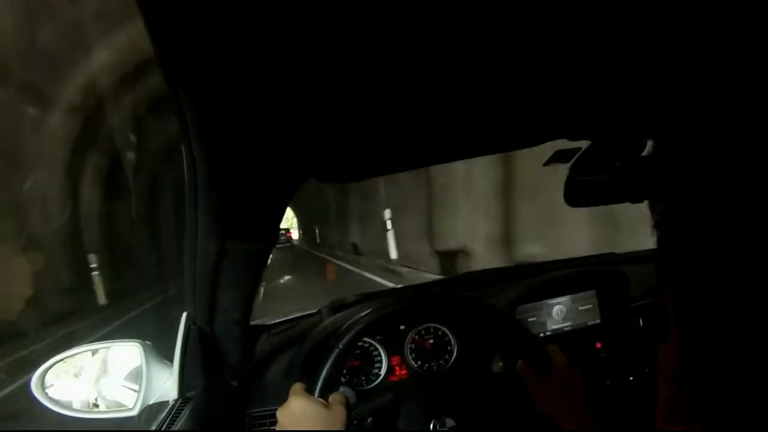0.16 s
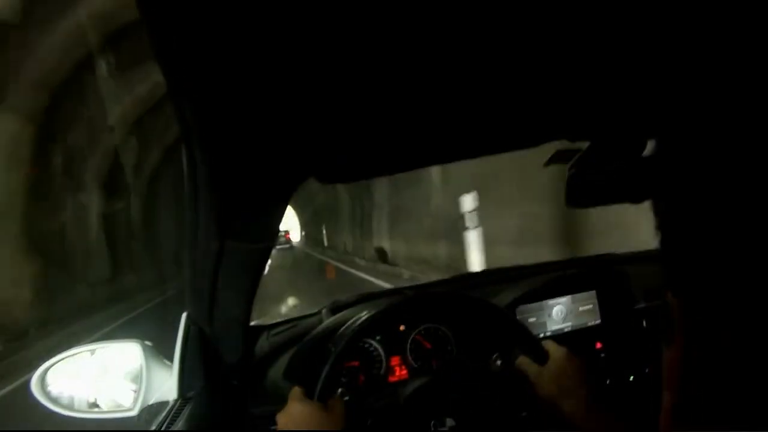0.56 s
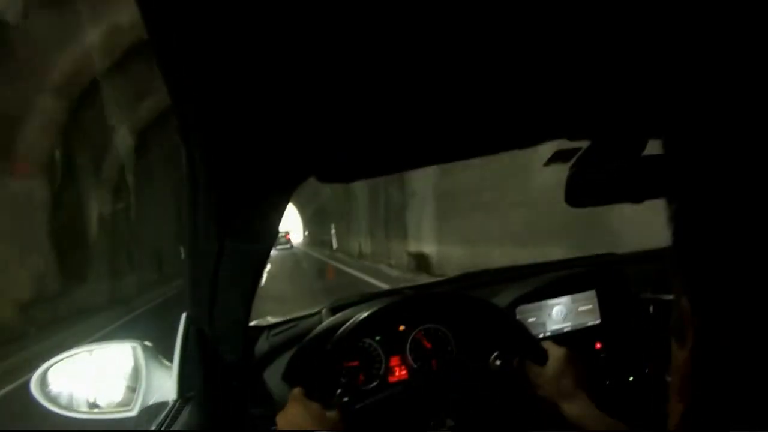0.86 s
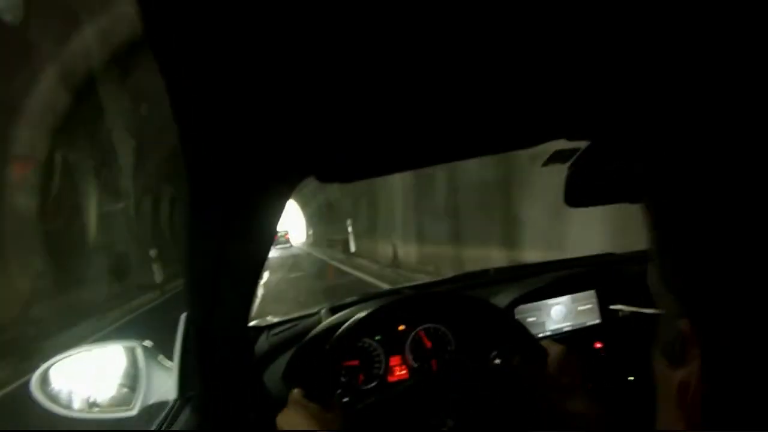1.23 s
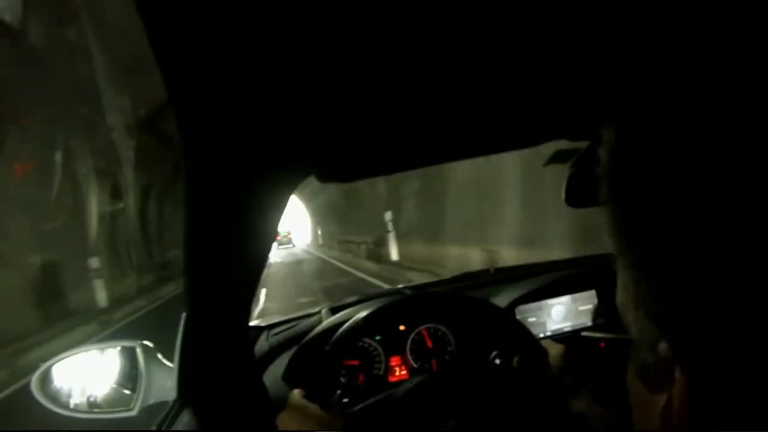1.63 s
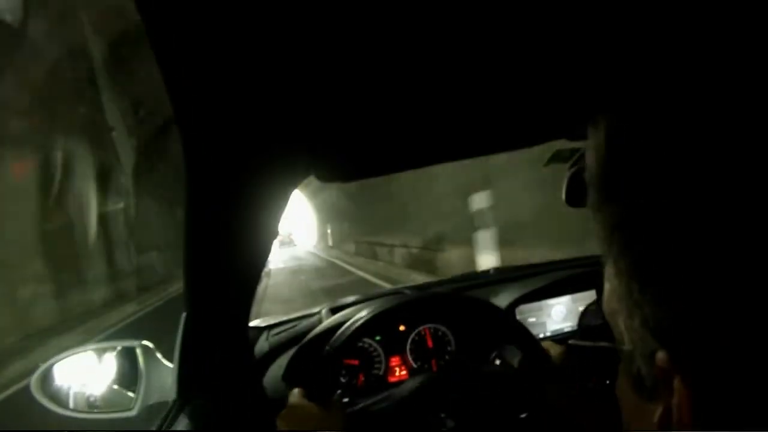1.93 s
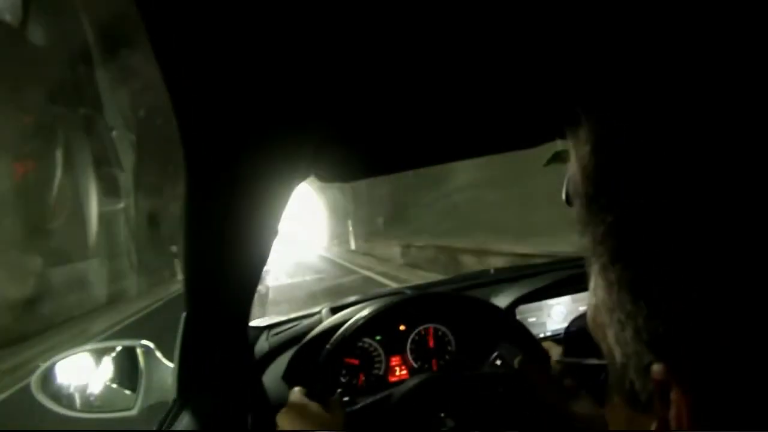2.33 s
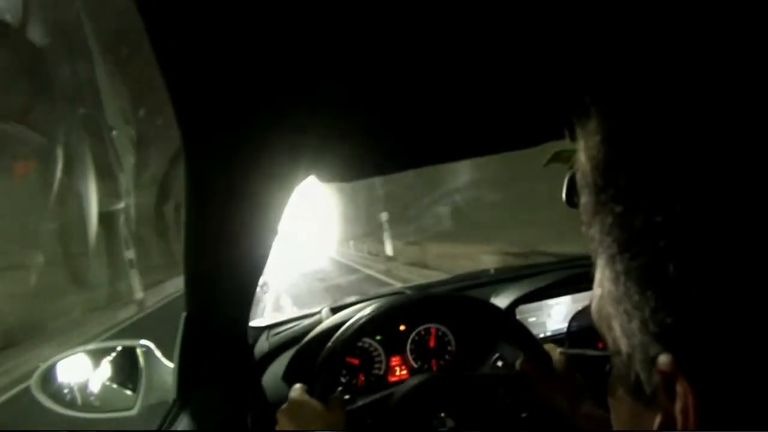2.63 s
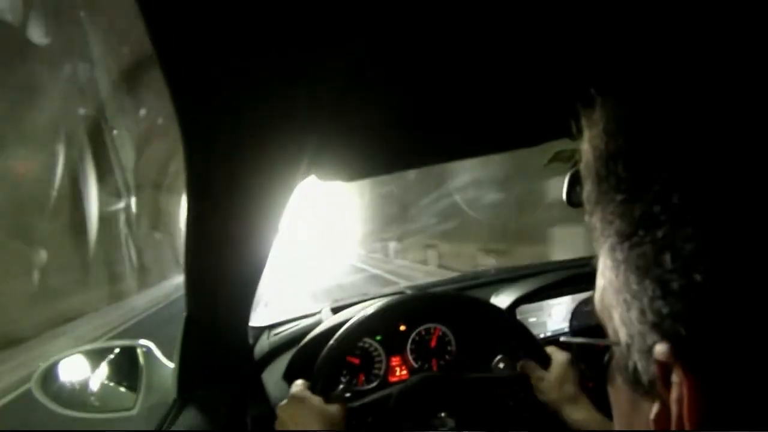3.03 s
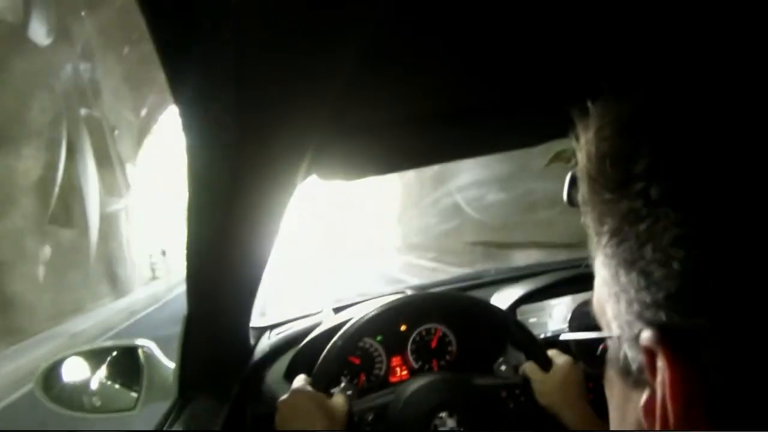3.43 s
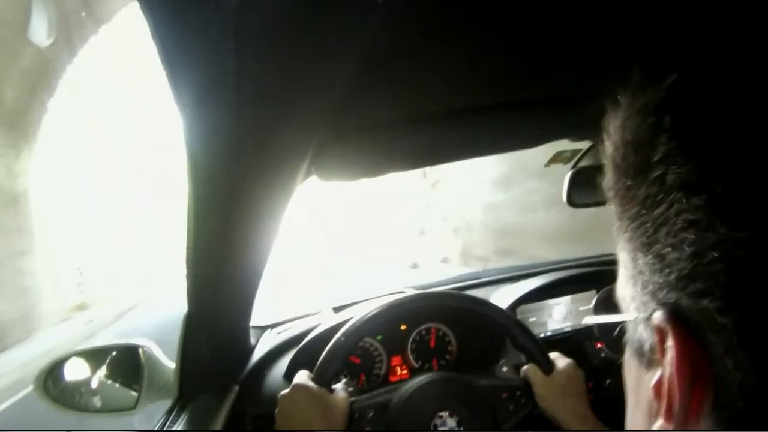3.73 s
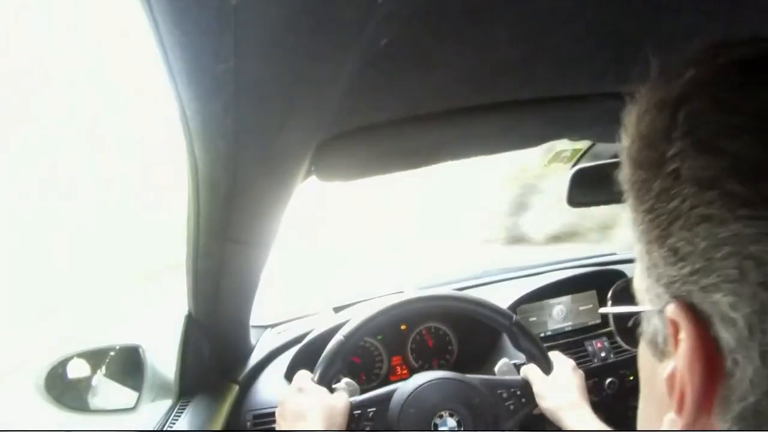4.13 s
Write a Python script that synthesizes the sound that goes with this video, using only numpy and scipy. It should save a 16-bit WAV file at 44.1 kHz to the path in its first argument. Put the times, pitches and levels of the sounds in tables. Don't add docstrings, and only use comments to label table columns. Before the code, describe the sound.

Inside a speeding car with an open window, a loud multi-cylinder exhaust climbs through tunnel reverberation, then sinks as the car comes out.

```python
import sys
import numpy as np
from scipy import signal
from scipy.fft import rfft, irfft, next_fast_len
from scipy.io import wavfile
from scipy.ndimage import uniform_filter1d, map_coordinates

SR = 44100
rng = np.random.default_rng(int(sys.argv[2]) if len(sys.argv) > 2 else 0)


def int16_out(signal):
    q = np.round(np.clip(np.atleast_2d(signal).T, -1, 1) * 32767)
    wavfile.write(sys.argv[1], SR, q.astype(np.int16))


def to_linear_factor(level_db):
    exponent = np.asarray(level_db, float) / 20
    return 10 ** exponent


N = 188262
TIME = np.arange(N) / SR


def unit(x):
    return x / np.sqrt(np.mean(x ** 2) + 1e-20)


def along(points, hz):
    f, value = np.transpose(points)
    return np.interp(np.log(hz + 1), np.log(f + 1), value)


def curve(rows):
    s, value = np.transpose(rows)
    return np.interp(TIME, s, value)


def bumps(rows):
    return sum(height * np.exp(-((TIME - s) / length) ** 2) for s, height, length in rows)


def wobble(rate):
    coarse = np.arange(0, N / SR + .01, .004)
    knots = rng.standard_normal(int(N * 40 / SR) + 4)
    return np.interp(TIME, coarse, map_coordinates(knots, [coarse * min(rate, 40)]))


def rush(spectrum, patchy_db):
    _, _, z = signal.stft(rng.standard_normal(N + 2048), SR, nperseg=1024)
    patches = uniform_filter1d(rng.standard_normal(z.shape), size=8, axis=0)
    patches = uniform_filter1d(patches, size=5, axis=1)
    noise = signal.istft(z * to_linear_factor(patchy_db * unit(patches)), SR, nperseg=1024)[1]
    m = next_fast_len(len(noise))
    colour = to_linear_factor(along(spectrum, np.fft.rfftfreq(m, 1 / SR)))
    return unit(irfft(rfft(noise, m) * colour, m)[:N])


# (t/s, f/Hz)
BANK_RATE = [
    (0, 120.5),
    (.5, 136.3),
    (.75, 145.8),
    (2, 197.5),
    (2.75, 229.9),
    (2.9, 233.7),
    (3.05, 234),
    (3.28, 233.6),
    (3.4, 218),
    (4.27, 137.1),
]


def crankshaft():
    bank_hz = curve(BANK_RATE)
    return bank_hz, 2 * np.pi * np.cumsum(bank_hz) / SR + .05 * wobble(14)


# (t/s, level/dB)
LIFT_OFF = [
    (0, 0),
    (2.95, 0),
    (3.22, -6),
    (4.27, -7),
]


def throttle():
    return curve(LIFT_OFF)


# (f/Hz, width/Hz, level/dB)
PIPE_MODES = [(190, 73, 1), (220, 37, -8.5), (323.4, 59, 9.5), (570, 93, 2.5), (800, 41, -8.5),
              (1024, 57, 2), (1340, 48, -18.5), (1860, 96, -11), (2650, 140, -18.5)]


def pipe_gain(hz):
    grid = np.arange(0, 4000, 4)
    power = sum(to_linear_factor(2 * db) / (1 + (2 * (grid - f) / width) ** 2) for f, width, db in PIPE_MODES)
    return np.interp(hz, grid, np.sqrt(power))


# (f/Hz, width/Hz, level/dB)
CABIN_MODES = [(126.8, 16, -0.5), (157, 55, -7.5), (196.9, 24, -5.5), (228.8, 25.3, -3.5),
               (260.7, 31, -8.5), (315.7, 38, -4.5), (364.7, 40, -11.5)]
# (f/Hz, width/Hz, level/dB)
TAILPIPE_MODES = [(414, 25, -18.5), (495.2, 53, -7), (538.6, 59, -5.5), (591.5, 58, -10.5), (664, 98, -13),
                  (776, 35, -9.5), (1025, 107, -4.5), (1220, 280, -13.5), (1444, 79, -6.5),
                  (1856, 350, -11)]


def boom_gain(hz):
    grid = np.arange(0, 4000, 2)
    power = sum(to_linear_factor(2 * db) / (1 + (2 * (grid - f) / width) ** 4) ** 1.26
                for f, width, db in [*CABIN_MODES, *TAILPIPE_MODES])
    return np.interp(hz, grid, np.sqrt(power))


UNEVENNESS = [-5, -4.5, -4, -2.5, 1.5]
# (fifths of the bank rate, level/dB, tilt/dB per octave of revs)
LEADING_TONES = [(5, 0, -3), (7, -10.5, -0.5), (8, -5.5, 1), (9, -9.5, 5.5), (10, 1, -7),
                 (11, -10.5, -18.5), (13, -9.5, -3.5), (15, 0.5, 2.5), (18, -11.5, -12), (19, -7.5, -11.5),
                 (20, -6, -17), (25, -6.5, -5.5), (30, -7.5, -2), (35, -13, 10), (40, -16.5, -1.5),
                 (45, -13, 2.5), (50, -15, 0.5), (55, -17.5, 0.5)]
# (fifths of the bank rate, t/s, level/dB, length/s)
TONE_SWELLS = [(7, 1.16, -15, .16), (7, 1.6, -17, .22), (7, 2.28, -11, .09), (4, 2.8, -16, .22),
               (16, .75, -21, .17), (9, 2.1, -21, .2), (10, 2.28, -21, .13), (10, 2.88, -19, .12),
               (15, 0, -21, .07)]


def exhaust_tones(bank_hz, turn, throttle_db):
    opens_s, opening_s, shut_db = .55, 0.033, -9
    muffled_db = shut_db * (1 - np.tanh((TIME - opens_s) / opening_s)) / 2
    octaves = np.log2(bank_hz / 162.8)
    leads = {round(n): rest for n, *rest in LEADING_TONES}
    out = 0
    for fifth in range(1, 61):
        k = fifth / 5
        if fifth in leads:
            db, tilt_db = leads[fifth]
            level_db = -9.5 + db + tilt_db * octaves + 0.84 * k * throttle_db + (k > 3) * muffled_db
            size = to_linear_factor(level_db) * boom_gain(k * bank_hz)
        else:
            uneven_db = UNEVENNESS[(fifth - 1) % 5] * (1.5 if k > 3 else 1)
            size = to_linear_factor(uneven_db - 29.5) * to_linear_factor(2 * throttle_db) * pipe_gain(k * bank_hz)
        swells = [(s, to_linear_factor(db), length) for n, s, db, length in TONE_SWELLS if round(n) == fifth]
        size = size + bumps(swells)
        if fifth in (5, 7, 10, 15):
            flicker_db = 1.2
        elif fifth % 5 == 0:
            flicker_db = 2
        else:
            flicker_db = min(.7 * k, 3.5)
        flicker = to_linear_factor(flicker_db * wobble(18))
        out = out + size * flicker * np.sin(k * turn + rng.uniform(0, 2 * np.pi))
    return out


# (t/s, level/dB)
EFFORT = [(0, -34.5), (.4, -37), (.75, -34.5), (.83, -36.5), (1, -30), (1.12, -32.5), (1.25, -31),
          (1.6, -34), (2.1, -28.5), (2.85, -28.5), (3.15, -28.5), (3.5, -35), (3.95, -27.5), (4.2, -39.5),
          (4.27, -36)]
# (f/Hz, level/dB per Hz)
RASP_COLOUR = [(300, -68), (800, -1.5), (1100, -3.5), (1450, -2), (1600, -10.5), (2000, -7.5),
               (2600, -14.5), (3300, -20), (5000, -45), (12000, -120)]


def exhaust_rasp(turn, throttle_db):
    gate = 1 + 0.098 * np.cos(turn)
    level_db = curve(EFFORT) + 6.5 + 0.13 * throttle_db
    return to_linear_factor(level_db) * unit(gate * rush(RASP_COLOUR, patchy_db=0.84))


# (f/Hz, decay by 60 dB/s)
TUNNEL_DECAY = [(100, 0.64), (500, 2.12), (1500, 4.3), (4000, 0.76)]


def tunnel_tail(x):
    frames = dict(fs=SR, nperseg=4096, noverlap=3072)
    hz, t, z = signal.stft(x, **frames)
    keep = to_linear_factor(-120 * (t[1] - t[0]) / along(TUNNEL_DECAY, hz))
    stored = np.abs(z) ** 2
    stored[:, 0] = stored[:, 2]
    for i in range(1, len(t)):
        stored[:, i] = keep * stored[:, i - 1] + (1 - keep) * stored[:, i]
    lowered = np.array([np.interp(hz * 1.035, hz, column) for column in stored.T]).T
    noise = signal.stft(rng.standard_normal(N), **frames)[2]
    noise = noise / np.sqrt(np.mean(np.abs(noise) ** 2))
    return signal.istft(noise * np.sqrt(lowered), **frames)[1][:N]


def tunnel_answer(tones, throttle_db):
    exit_s, exit_length_s, outside_db = 3.87, 0.3, -8
    outside = (1 + np.tanh((TIME - exit_s) / exit_length_s)) / 2
    level_db = -8.5 + 2 * TIME - 0.49 * throttle_db + outside_db * outside
    return to_linear_factor(level_db) * tunnel_tail(tones)


# (t/s, buffet level/dB, road level/dB, length/s)
GUST_HITS = [(0, 5, -3, 0.048), (.72, 6, 7, 0.075), (0.809, -3, -22, 0.036), (.88, 7, 1, .03),
             (1.055, 7.5, 1, 0.086), (1.7, 5, -0.5, .05), (2.24, -7, -1.5, 0.09), (2.594, 1, 3.5, 0.059),
             (3.11, 9.5, 2, 0.032), (3.459, 3, 2, 0.075), (3.7, 2.5, 1, 0.29), (4.11, 7.5, 4.5, 0.085)]
# (f/Hz, level/dB per Hz)
BUFFET_COLOUR = [(8, -34), (15, -1), (32, -5.5), (60, -4), (100, -9.5), (160, -27), (400, -57.5),
                 (2000, -120)]


def window_buffet():
    gusts_db = bumps([(s, db, length) for s, db, _, length in GUST_HITS])
    level_db = -21.5 + 1.5 * wobble(6.6) + gusts_db
    return to_linear_factor(level_db) * rush(BUFFET_COLOUR, patchy_db=0.0)


# (f/Hz, level/dB per Hz)
TYRE_COLOUR = [(40, -62.5), (100, -4), (160, -8.5), (210, -0.5), (280, -12.5), (600, -17.5), (900, -14.5),
               (1500, -25.5), (3000, -45.5), (8000, -120)]


def tyre_roar():
    gusts_db = bumps([(s, db, length) for s, _, db, length in GUST_HITS])
    level_db = -24 + 2 * TIME + gusts_db + 1.5 * wobble(18)
    return to_linear_factor(level_db) * rush(TYRE_COLOUR, patchy_db=2.0)


# (t/s, level/dB)
WIND = [(0.0, -48.5), (0.29, -49), (0.37, -51.5), (0.73, -46), (0.85, -50), (0.92, -46), (1.11, -48.5),
        (1.59, -48), (1.6, -46), (1.79, -48), (2.79, -43), (3.18, -47), (3.98, -49), (4.25, -53.5)]
# (f/Hz, level/dB per Hz)
HISS_COLOUR = [(1000, -54), (2500, -9.5), (3300, -2.5), (4000, 1), (5000, -3), (6300, -5.5), (7200, -11.5),
               (8500, -16), (10000, -21), (11500, -29), (13000, -33.5), (15000, -38.5), (16000, -68.5),
               (22000, -120)]
# (f/Hz, level/dB per Hz)
AIRY_COLOUR = [(5000, -47.5), (8000, -7), (10000, -0.5), (12000, -6.5), (14000, -13), (15500, -24.5),
               (17000, -58.5), (22000, -120)]


def wind_hiss():
    hiss_db = curve(WIND) + 0.61 * wobble(12)
    airy_db = -63 + 1.5 * (uniform_filter1d(hiss_db, size=SR // 3) + 47)
    hiss = to_linear_factor(hiss_db + 2.04) * rush(HISS_COLOUR, patchy_db=0.2)
    return hiss + to_linear_factor(airy_db) * rush(AIRY_COLOUR, patchy_db=3.5)


# (t/s, f/Hz, level/dB, length/s)
WALL_SLAPS = [
    (1.28, 36.9, -9, 0.033),
    (3.1, 79, -11.5, 0.022),
    (3.1, 30.1, -10, 0.042),
    (3.4, 27.6, -17, 0.063),
    (4.065, 135, -7, 0.031),
    (4.16, 137.8, -16, .05),
    (4.11, 32.2, -15.5, 0.038),
    (4.17, 216, -6, 0.052),
]


def wall_thuds():
    out = 0
    for s, hz, db, length in WALL_SLAPS:
        since = TIME - s
        out = out + to_linear_factor(db) * np.exp(-2 * (since / length) ** 2) * np.cos(2 * np.pi * hz * since)
    return out


def scene():
    bank_hz, turn = crankshaft()
    throttle_db = throttle()
    tones = exhaust_tones(bank_hz, turn, throttle_db)
    engine = tones + exhaust_rasp(turn, throttle_db) + tunnel_answer(tones, throttle_db)
    air = window_buffet() + tyre_roar() + wind_hiss()
    return (engine + air + wall_thuds())[None]


def low_pass(x):
    return signal.sosfilt(signal.butter(12, 15150, fs=SR, output="sos"), x)


def record(dry):
    ceiling, hardness = .72, 3.5
    squashed = dry / (1 + np.abs(dry / ceiling) ** hardness) ** (1 / hardness)
    edge = np.minimum(np.arange(N), N + 90 - np.arange(N)) / (.002 * SR)
    fade = np.sin(np.pi / 2 * np.clip(edge, 0, 1)) ** 2
    return low_pass(squashed * fade)


dry = scene()
out = record(dry)
int16_out(out)
```